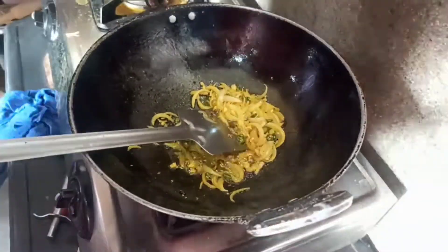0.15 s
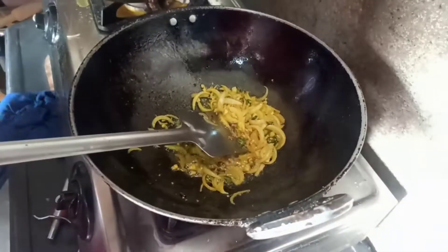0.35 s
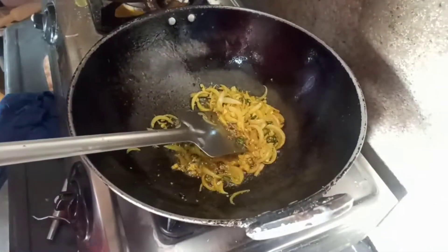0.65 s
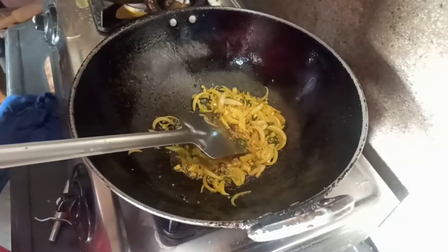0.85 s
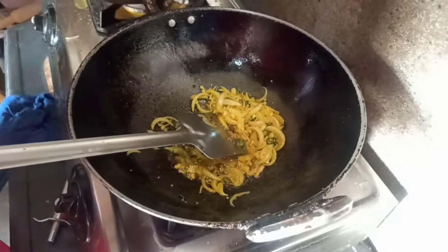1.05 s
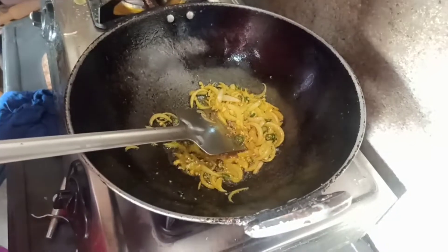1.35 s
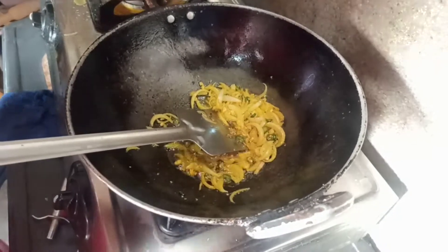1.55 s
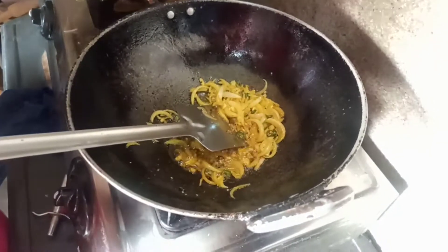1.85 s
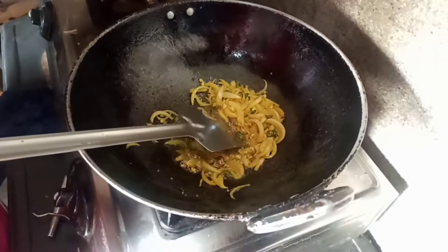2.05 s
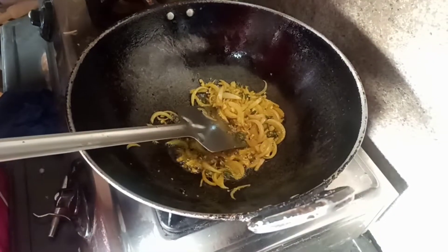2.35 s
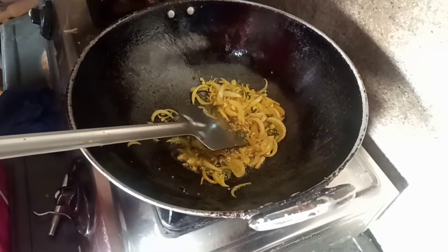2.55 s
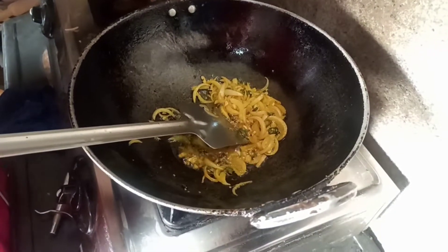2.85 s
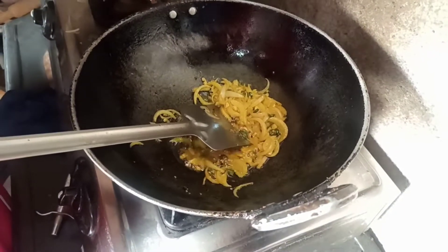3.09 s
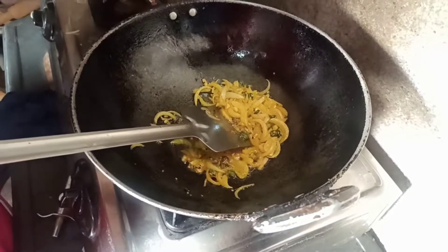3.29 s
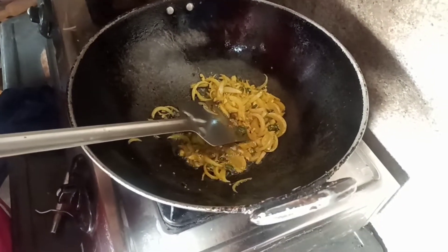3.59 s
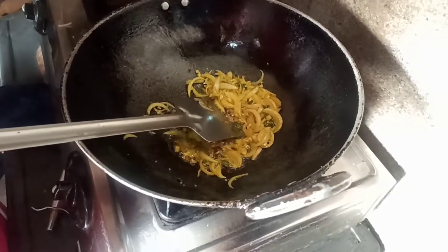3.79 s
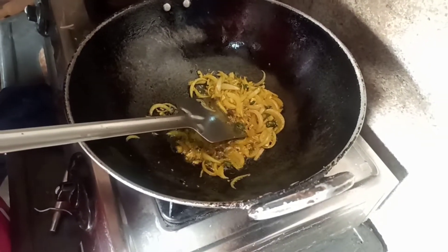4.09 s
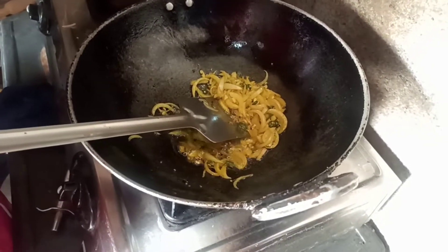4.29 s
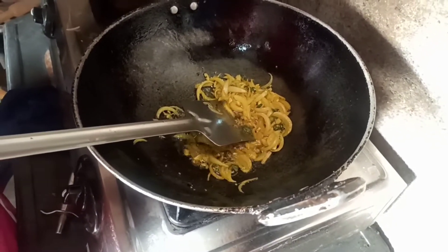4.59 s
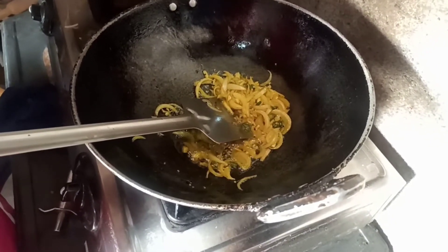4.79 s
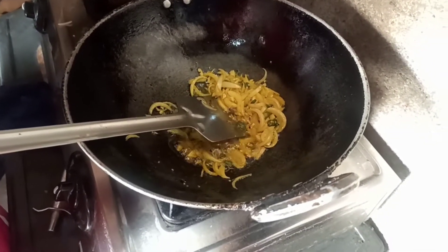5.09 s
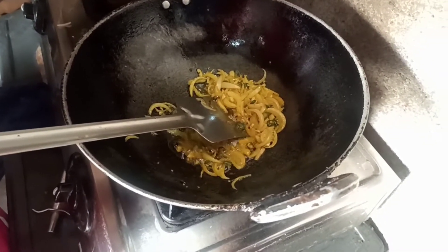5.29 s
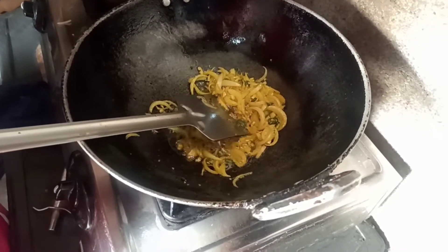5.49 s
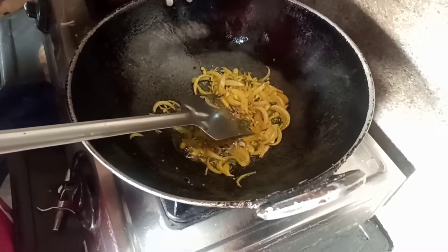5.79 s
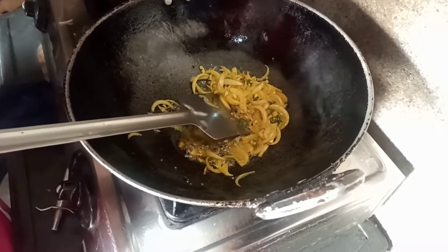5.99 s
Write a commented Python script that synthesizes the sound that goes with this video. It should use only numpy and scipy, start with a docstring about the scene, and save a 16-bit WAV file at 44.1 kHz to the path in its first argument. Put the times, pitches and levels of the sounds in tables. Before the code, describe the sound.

Close up in a small kitchen, onions sizzle and crackle in hot oil while a gas burner rumbles faintly underneath. A metal spatula hits the wok right away with dull knocks, bright taps and short scrapes. Two sharp oil spits lead to one loud, hollow knock. After a stretch of soft touches and one more spit, several firmer knocks return as the frying continues.

```python
"""Sliced onions sizzle in an oiled wok from the start, as steam bubbles burst over a rumbling gas flame.
A steel spatula taps, knocks and scrapes the pan at once. The oil spits twice, and just after one second
comes the hardest knock. Lighter touches and one more spit follow, then firmer strokes from about four
to six seconds. All along, the frying slowly calms and a small kitchen throws each knock back."""
import sys
import numpy as np
from scipy import signal
from scipy.fft import rfft, irfft
from scipy.io import wavfile
from scipy.ndimage import uniform_filter1d

SR = 44100
rng = np.random.default_rng(int(sys.argv[2]) if len(sys.argv) > 2 else 0)


def wrap_up_sound(samples):
    """Save the sound to the file named by the first command line argument, as 16-bit audio."""
    columns = np.atleast_2d(samples).T
    # keep every value between -1 and 1, then stretch to whole-number steps
    tamed = np.clip(columns, -1, 1)
    steps = np.round(tamed * 32767).astype(np.int16)
    wavfile.write(sys.argv[1], SR, steps)


N = 270721


def amp(db):
    """Turns decibels into a number to multiply by."""
    return 10 ** (np.asarray(db) / 20)

def unit(x):
    """Scales a signal to an average power of 1."""
    return x / np.sqrt(np.mean(x ** 2) + 1e-20)

def fade(t, t60):
    """A fade that falls 60 dB in t60 seconds, the 'ring time'."""
    return np.exp(-np.log(1000) * t / t60)

def curve_at(points, hz):
    """Reads between (Hz, value) points along a scale of pitch."""
    f, value = np.transpose(points)
    return np.interp(np.log(hz + 1), np.log(f), value)

def add(mix, start, sound):
    """Mixes a sound in at a start time in seconds."""
    part = mix[round(start * SR):][:len(sound)]
    part += sound[:len(part)]

def colour(x, points):
    """Turns each frequency up or down along a curve of (Hz, dB) points."""
    return irfft(rfft(x) * amp(curve_at(points, np.fft.rfftfreq(len(x), 1 / SR))), len(x))

def drift(hz):
    """A random wobble, mostly slower than hz times a second."""
    f = np.fft.rfftfreq(N, 1 / SR)
    return unit(irfft(rfft(rng.standard_normal(N)) * np.exp(-(f / hz) ** 2) * (f > 0), N))

def click(hz, octaves, size=1024):
    """A click that is strongest around hz; the fewer octaves wide, the clearer its pitch."""
    f = abs(np.fft.fftfreq(size, 1 / SR)) + 20
    log_gain = np.maximum(-3 * np.log1p((np.log2(f / hz) / octaves) ** 2 / 3), -10)
    spectrum = np.exp(np.conj(signal.hilbert(log_gain)))  # packs the energy at the start
    wave = np.fft.ifft(spectrum).real[:size // 2]
    return wave / abs(wave).max()

def scatter(x, strength=0.2, t60=0.034, size=1024):
    """The curved pan wall follows a click with a quick spray of faint copies."""
    t = np.arange(size) / SR
    copies = strength * rng.standard_normal(size) * (rng.random(size) < .25)
    copies *= fade(t, t60) * (t > .0005)
    copies[0] = 1  # the click itself
    return np.convolve(x, copies)

def resonate(x, tones):
    """The ringing that x stirs up in a set of dying tones."""
    t = np.arange(16384) / SR
    response = np.zeros(len(t))
    for hz, db, t60 in tones:
        ring = np.sin(2 * np.pi * hz * t) * fade(t, t60)
        response += amp(db) * ring * 2 * np.log(1000) / (t60 * SR)  # a longer ring gets no extra gain
    return signal.oaconvolve(x, response)[:N]


# The tone of the frying oil's hiss. Each row: frequency in Hz, relative level in dB.
HISS_CURVE = [(150, -16), (400, -4.5), (800, -2), (1080, -7), (1300, -2.5), (3000, -4.5), (4300, -1.5),
              (5200, -3.5), (6800, -4.5), (8300, -5), (12000, -5.5), (15500, -11)]
def sizzle(patch_db=1.0, flutter_db=0.35):
    """Countless tiny steam bubbles merge into a hiss; each size of bubble comes in its own flurries."""
    bursts = rng.standard_normal(N) * (rng.random(N) < .6)
    _, _, bands = signal.stft(bursts, SR, nperseg=512)
    patches = uniform_filter1d(rng.standard_normal(bands.shape), size=14, axis=0)  # smooth over pitch
    patches = unit(uniform_filter1d(patches, size=8, axis=1))  # and over time
    hiss = signal.istft(bands * amp(patch_db * patches), SR, nperseg=512)[1][:N]
    return unit(colour(hiss, HISS_CURVE)) * amp(flutter_db * drift(hz=35))

def crackle(per_s=170, spread_db=3.0, level_db=-11, pitches=24):
    """Larger bubbles burst one by one, each size with its own pitch."""
    out = np.zeros(N)
    for hz in np.geomspace(1900, 6000, pitches):
        chance, size, sign = rng.random((3, N))
        strength = amp(spread_db * np.minimum(-np.log(size + 1e-9), 4))  # many weak, a few strong
        bursts = strength * np.sign(sign - .5) * (chance < per_s / pitches / SR)
        out += signal.oaconvolve(bursts, unit(scatter(click(hz, octaves=0.85))))[:N]
    return amp(level_db) * unit(out)


# The tone of the gas flame. Each row: frequency in Hz, relative level in dB.
FLAME_CURVE = [(20, -24), (45, -27), (75, -1), (98, -10.5), (122, 4), (150, -7), (195, -2.5), (250, -9.5),
               (400, -11), (900, -35.5), (3000, -67)]
def flame(level_db=-55.0):
    """Burning gas makes a steady, low rumble."""
    return amp(level_db) * unit(colour(rng.standard_normal(N), FLAME_CURVE))


# The high tones of the wok's steel. Each row: pitch in Hz, gain in dB, ring time in seconds.
STEEL_TONES = [(1441, -2.5, 0.039), (1794, 0.5, 0.064), (2144, -4, 0.04), (2400, -10, 0.044),
               (2770, -27, 0.079), (3960, -13, 0.028), (4700, -9, 0.065)]
def wok(bright, dull, lowest_hz=105):
    """Bright sounds set the steel ringing; the pan is too small to give off deep bass."""
    bass_cut = signal.butter(4, lowest_hz, "high", fs=SR, output="sos")
    return signal.sosfilt(bass_cut, bright + resonate(bright, STEEL_TONES) + dull)

def kitchen(x, echo_db, low_t60=0.25, high_t60=0.26, size=22050):
    """Nearby walls add a short tail of echoes, starting after 5 milliseconds."""
    echoes = rng.choice([-1., 1.], size) * (rng.random(size) < 3000 / SR)
    echoes *= np.arange(size) > .005 * SR
    hz, t, bands = signal.stft(echoes, SR, nperseg=256)
    t60 = curve_at([(500, low_t60), (8000, high_t60)], hz)[:, None]
    tail = signal.istft(bands * fade(t, t60), SR, nperseg=256)[1]
    return x + amp(echo_db) * signal.oaconvolve(x, tail / np.linalg.norm(tail))[:N]


# Short clicks at the pan: spatula taps, plus two pings of bursting bubbles at 1.96 and 3.413 seconds.
# Each row: start in seconds, level in dB, pitch in Hz, width in octaves.
PAN_CLICKS = [(.0804, -25.5, 3120, 0.86), (0.1134, -18.5, 736, 0.71), (0.1144, -14.5, 2300, 1.05),
              (0.3426, -25, 2600, 1.5), (.466, -22, 3800, 1.25), (1.0566, -27.5, 900, 1.2),
              (1.073, -27.5, 1200, 1.3), (1.0852, -16.5, 2120, 1.08), (1.0967, -22, 4800, .9),
              (1.2085, -31.5, 2180, 0.66), (1.96, -31, 3760, 0.36), (2.9808, -37.5, 1090, 0.69),
              (3.413, -35.5, 3670, .25), (3.907, -24, 2400, 1.86), (4.472, -26.5, 3200, 1.3),
              (4.8211, -19, 4900, 1.3), (5.0792, -17, 2680, 1.87), (5.545, -30, 4400, .8),
              (5.881, -25, 4660, 0.55)]
def pan_clicks(repeat_s=.0023, repeat_db=-13):
    """Each tap or bubble clicks, then repeats once, softer; the pan wall scatters both clicks."""
    out = np.zeros(N)
    for start, db, hz, octaves in PAN_CLICKS:
        tick = click(hz, octaves)
        add(out, start, amp(db) * scatter(tick))
        add(out, start + repeat_s, amp(db + repeat_db) * scatter(tick))
    return out


def dull_note(hz, swell_s, upper_db, upper_ratio=1.452, cushion_s=0.002):
    """Two tones swell and die together; the slower the blow, the weaker the upper one."""
    t = np.arange(8192) / SR
    phase, age = 2 * np.pi * hz * t, t / swell_s
    upper = amp(upper_db) * np.exp(-swell_s / cushion_s)
    return age * np.exp(1 - age) * (np.sin(phase) + upper * np.sin(upper_ratio * phase))

# The low tones of the bowl and the air over it. Each row: pitch in Hz, gain in dB, ring time in seconds.
HOLLOW_TONES = [(122, 3, .6), (168, 0, .25), (338, -3, .13), (384, -3, .13), (450, 0, .15), (527, 7.5, .15),
                (596, 2, .14), (707, 5, .15), (785, 1, .15), (865, -1, .12)]
# Dull knocks of the spatula on the full pan. Each row: start in seconds, level in dB, pitch in Hz,
# swell time in seconds, rebound level in dB relative to the knock.
SPATULA_KNOCKS = [(0.099, -37.5, 238, 0.0013, -20), (.1134, -27.5, 560, 0.00017, -26),
                  (.171, -39, 149, 0.003, -20), (.3385, -34, 276, 0.00095, -15),
                  (.3405, -27.5, 559, .0013, -10.5), (1.0535, -31, 330, 0.0057, -17),
                  (1.0699, -22, 366, 0.0037, -17), (1.0847, -9.5, 493, .0014, -6),
                  (1.4247, -44.5, 536, 0.0025, -13), (1.70, -46.5, 452, .0034, -2),
                  (1.94, -45.5, 482, 0.0027, -13), (1.959, -39, 487, 0.005, -8),
                  (1.982, -39.5, 463, 0.0042, -11), (2.085, -43.5, 640, 0.0016, -23),
                  (2.323, -42.5, 590, 0.0022, -17), (2.9802, -42, 460, 0.0049, -10),
                  (3.1633, -48.5, 500, .0014, 0), (3.8838, -29.5, 542, .002, -8),
                  (3.906, -42, 584, .0012, -8), (4.116, -35, 432, 0.0066, -.5),
                  (4.468, -45, 600, .0011, -7), (4.8208, -30.5, 536, 0.004, -9),
                  (5.0428, -37.5, 570, 0.0026, -15), (5.0777, -34, 504, 0.0015, -4),
                  (5.119, -38.5, 640, 0.0011, -14), (5.5412, -39, 529, 0.0037, -10),
                  (5.8795, -29, 540, 0.0021, -26)]
def knocks(middling_db=-36, rebound_s=0.01323, hollow_delay_s=.0125):
    """Food cushions the blade: a dull note and a thud, then a rebound and the bowl's hollow ring."""
    direct, into_bowl = np.zeros(N), np.zeros(N)
    for start, db, hz, swell_s, rebound_db in SPATULA_KNOCKS:
        harder_db = db - middling_db
        upper_db = 5 - 0.31 * harder_db  # a heavy blow sounds duller
        thud_gain = amp(-27 + 0.5 * harder_db)  # and shoves the pan on its stand
        thud = thud_gain * dull_note(hz=194, swell_s=.0025, upper_db=upper_db)
        blow = amp(db) * (dull_note(hz, swell_s, upper_db) + thud)
        rebound = dull_note(hz * 1.054, swell_s=0.0051, upper_db=upper_db)  # a little higher
        add(direct, start, blow)
        add(direct, start + rebound_s, amp(db + rebound_db) * rebound)
        add(into_bowl, start + hollow_delay_s, amp(-1 + 0.0179 * harder_db) * blow)
    return direct + resonate(into_bowl, HOLLOW_TONES)


# Short slides of the blade.
# Each row: start in seconds, rough length in seconds, level in dB, pitch in Hz, width in octaves.
BLADE_SLIDES = [(0.122, 0.059, -43.5, 3600, 1.9), (.326, .04, -40.5, 770, 0.23),
                (0.327, 0.045, -44, 2050, .42), (4.466, .02, -44.5, 2440, 0.16),
                (5.08, 0.036, -48.5, 3800, 1.1), (5.881, 0.016, -38, 5500, 1.6)]
def scrapes(slips_per_s=3000, size=8192):
    """The blade sticks and slips in a quick run of tiny clicks that swells and fades."""
    out, t = np.zeros(N), np.arange(size) / SR
    for start, length, db, hz, octaves in BLADE_SLIDES:
        slips = rng.standard_normal(size) * (rng.random(size) < slips_per_s / SR)
        rasp = unit(np.convolve(slips, click(hz, octaves))[:size])
        age = 3 * t / length  # loudest a third of the way in
        add(out, start, amp(db) * rasp * age * np.exp(1 - age))
    return out


# Spits of hot oil. Each row: start in seconds, level in dB, bubble pitch in Hz.
OIL_SPITS = [(.6334, -30, 4160), (0.8321, -15, 7950), (2.3248, -31, 2680)]
# Drops that land after a spit. Each row: delay in seconds, level in dB relative to the spit, pitch in Hz.
FALLING_DROPS = [(0.011, -11, 4200), (.034, -16.5, 7500)]
def spits(crack_db=4.5):
    """Trapped water bursts with a crack, and the oil it throws up falls back."""
    out = np.zeros(N)
    crack = amp(crack_db) * click(hz=3600, octaves=6.5)
    for start, db, hz in OIL_SPITS:
        burst = click(hz, octaves=0.64) + crack
        add(out, start, amp(db) * scatter(burst, strength=0.39, t60=0.018))
        for delay, drop_db, drop_hz in FALLING_DROPS:
            add(out, start + delay, amp(db + drop_db) * scatter(click(drop_hz, octaves=0.5)))
    return out

def pings(per_s=1.1, level_db=-42, pitches=5):
    """Now and then a bubble rings briefly at one pitch."""
    out = np.zeros(N)
    for hz in np.geomspace(3500, 5900, pitches):
        starts = 1. * (rng.random(N) < per_s / pitches / SR)
        out += signal.oaconvolve(starts, scatter(click(hz, octaves=0.18)))[:N]
    return amp(level_db) * out


def scene(frying_db=-47, calming_db_per_s=0.1327):
    """Frying and spatula sound through the wok and kitchen, over the flame; both channels are alike."""
    calming = amp(frying_db - calming_db_per_s * np.arange(N) / SR)  # the onions slowly dry
    frying = calming * (sizzle() + kitchen(crackle(), echo_db=1.5))
    bright = frying + kitchen(pan_clicks() + scrapes() + spits() + pings(), echo_db=-10.0)
    dull = kitchen(knocks(), echo_db=-9.0)
    return np.tile(wok(bright, dull) + flame(), (2, 1))


# The microphone's uneven treble. Each row: frequency in Hz, gain in dB.
MIC_CURVE = [(3300, -2), (4200, 3), (4720, 3.5), (4820, -4), (5600, -2.5), (6020, -1.5), (6130, 6.5),
             (7620, 7.5), (7730, -0.5), (8480, 1.5), (8600, -9), (9300, -10.5), (10200, -19.5),
             (11500, -23), (11630, -6), (15400, -1.5)]
def record(dry, highest_hz=15550):
    """The microphone colours the sound, and the very highest treble is cut off."""
    heard = np.array([colour(channel, MIC_CURVE) for channel in dry])
    treble_cut = signal.firwin(1023, highest_hz, window=("kaiser", 9), fs=SR)
    return signal.oaconvolve(heard, treble_cut[None], "same")


dry = scene()
out = record(dry)
wrap_up_sound(out)
```